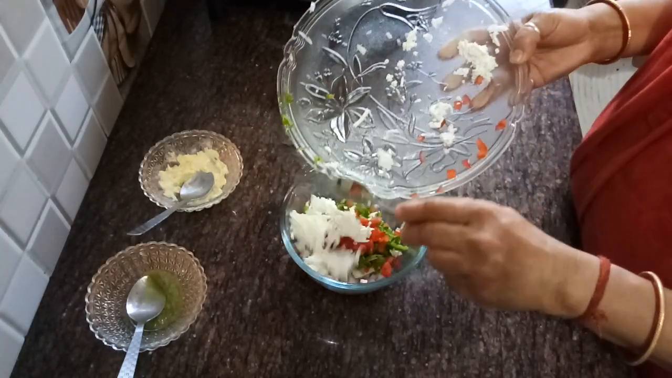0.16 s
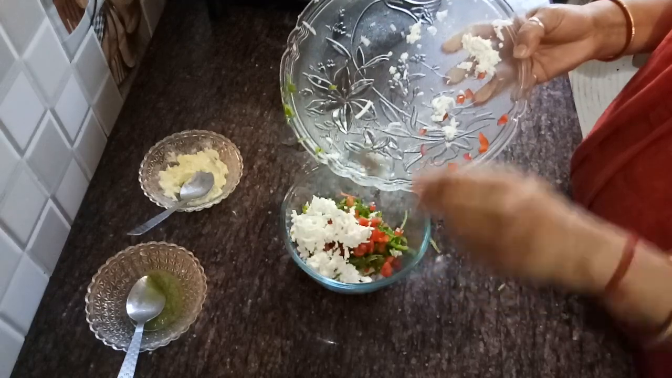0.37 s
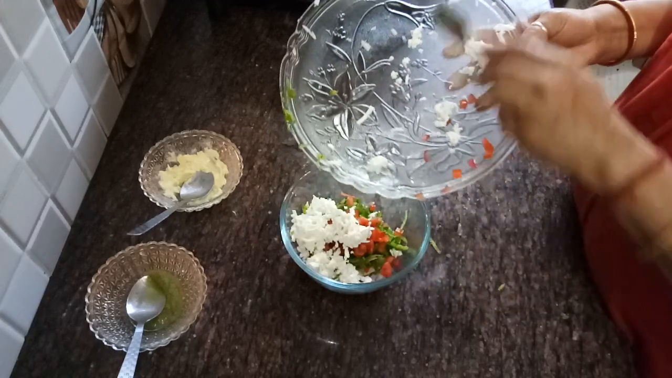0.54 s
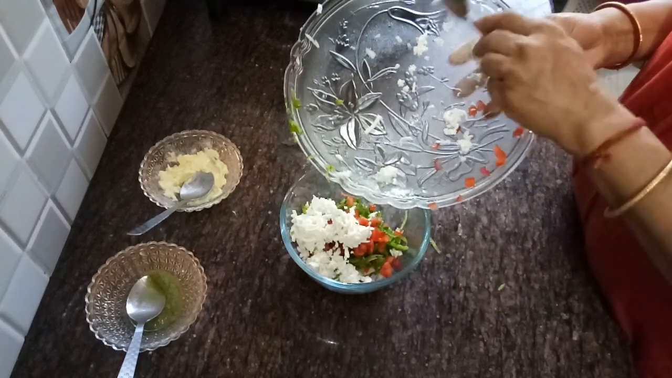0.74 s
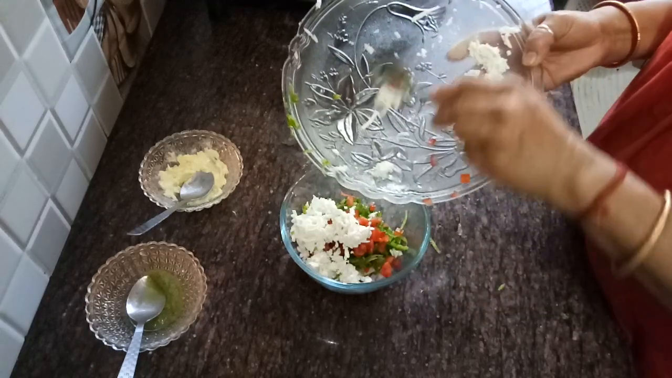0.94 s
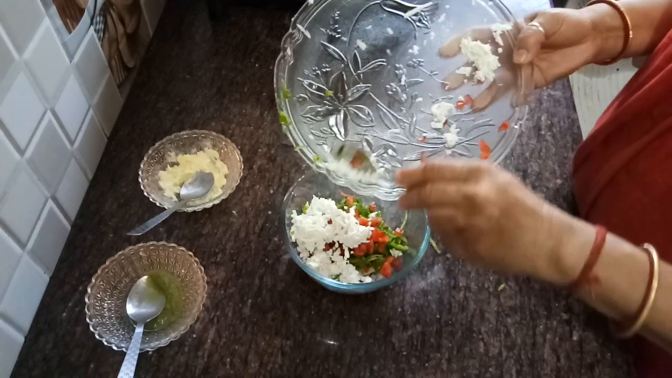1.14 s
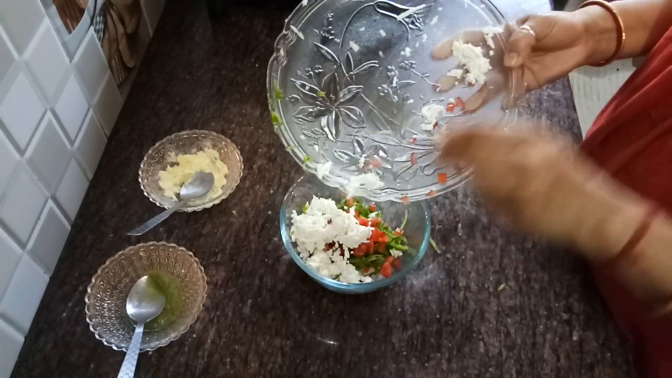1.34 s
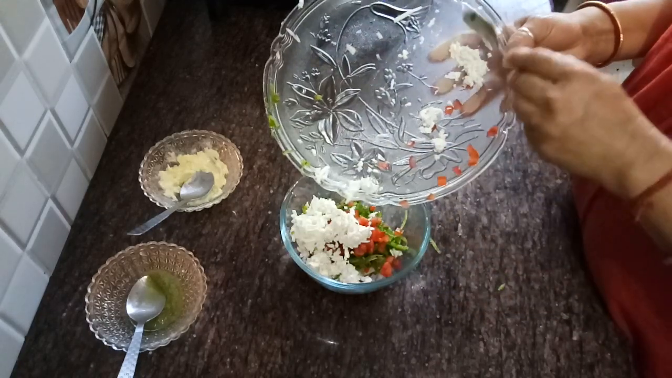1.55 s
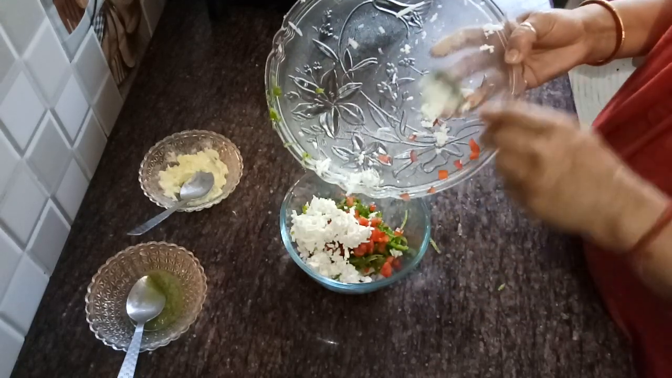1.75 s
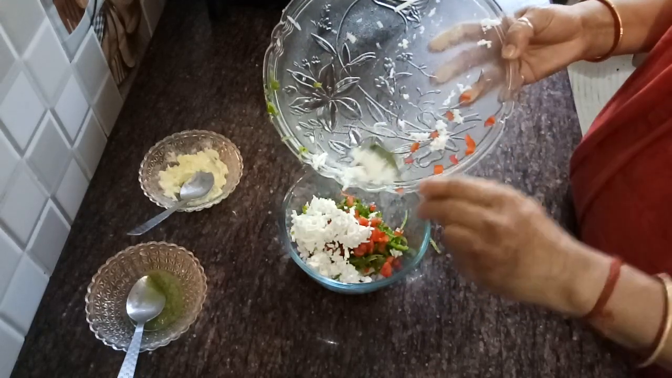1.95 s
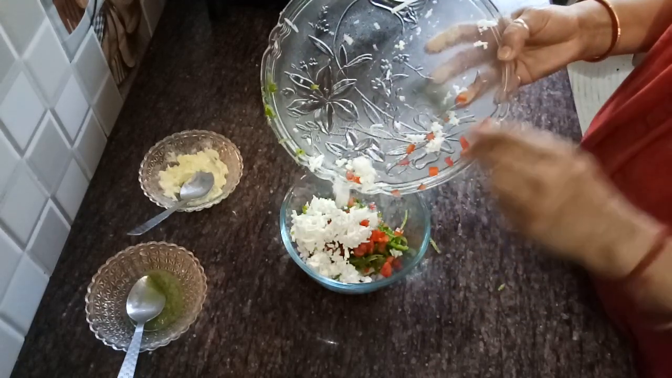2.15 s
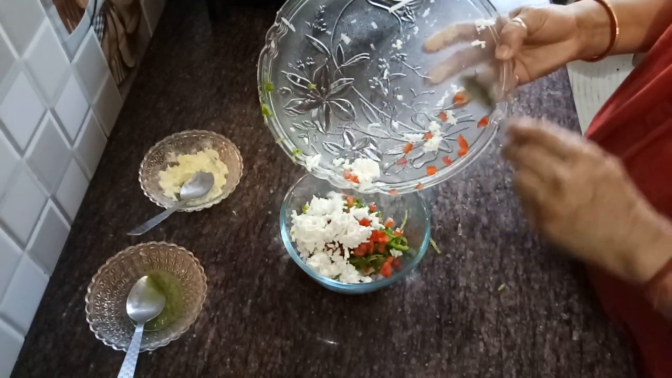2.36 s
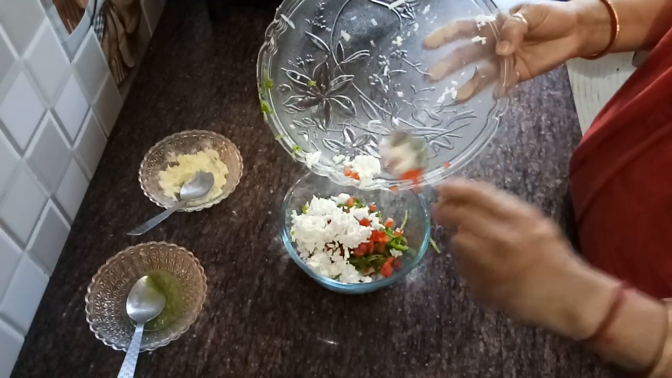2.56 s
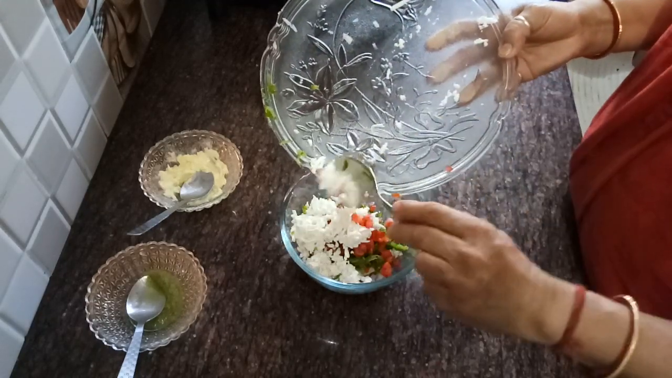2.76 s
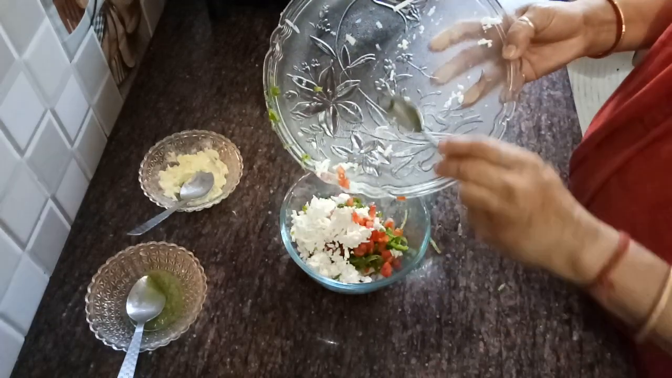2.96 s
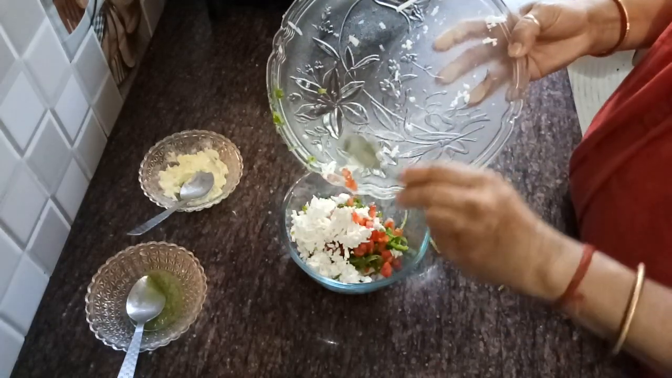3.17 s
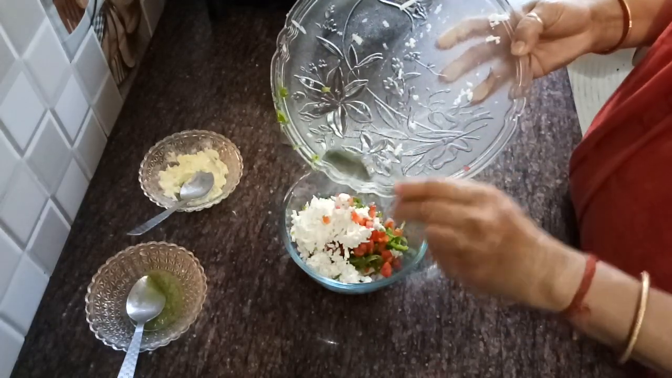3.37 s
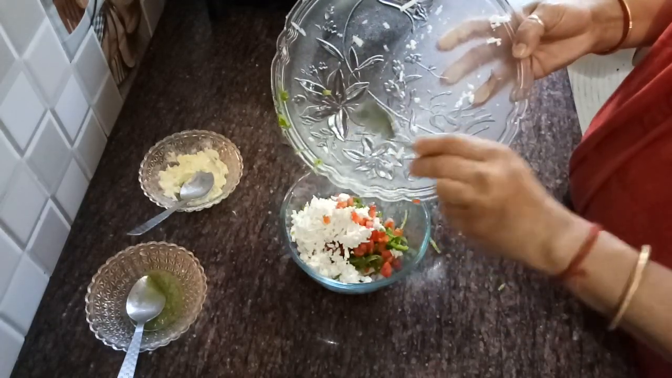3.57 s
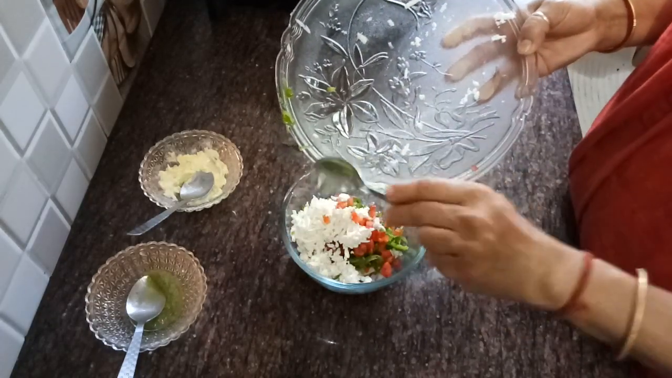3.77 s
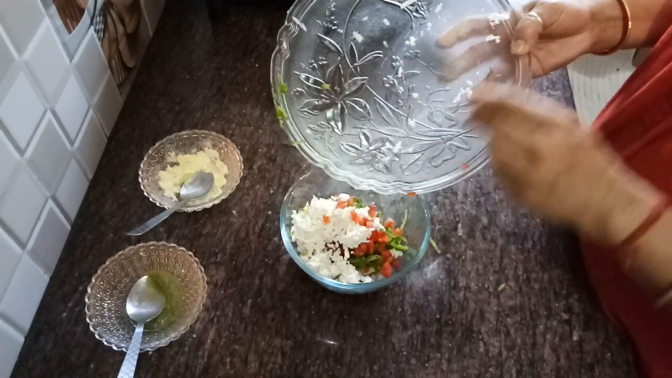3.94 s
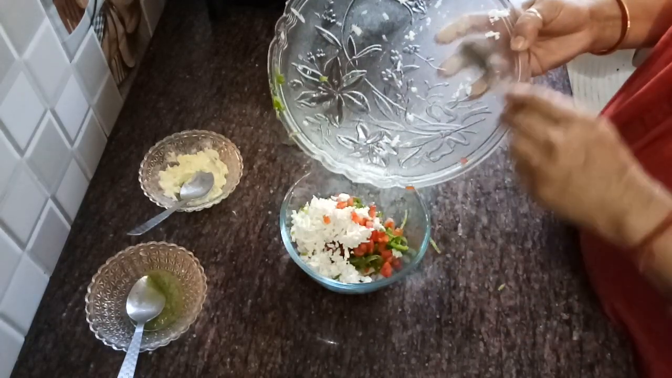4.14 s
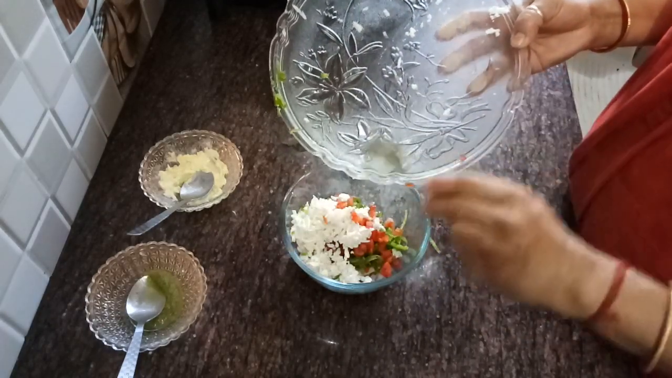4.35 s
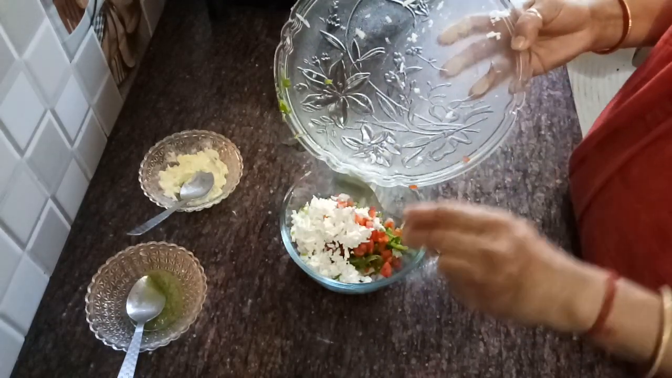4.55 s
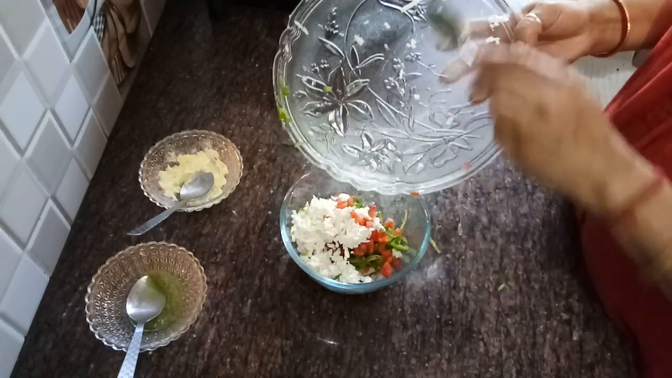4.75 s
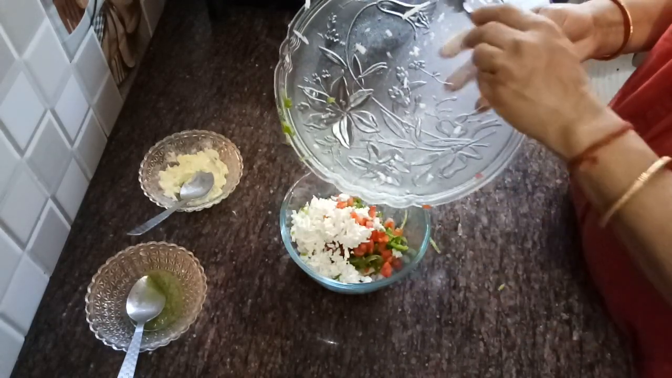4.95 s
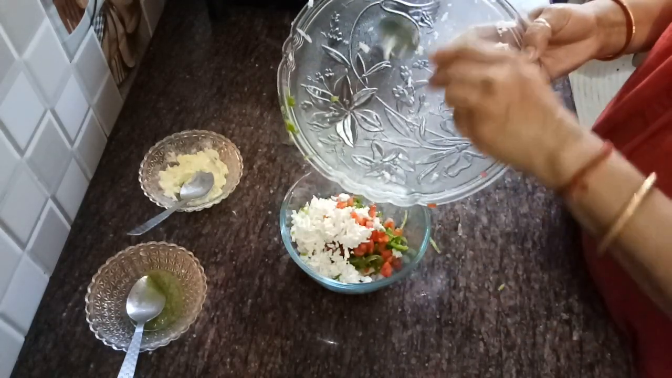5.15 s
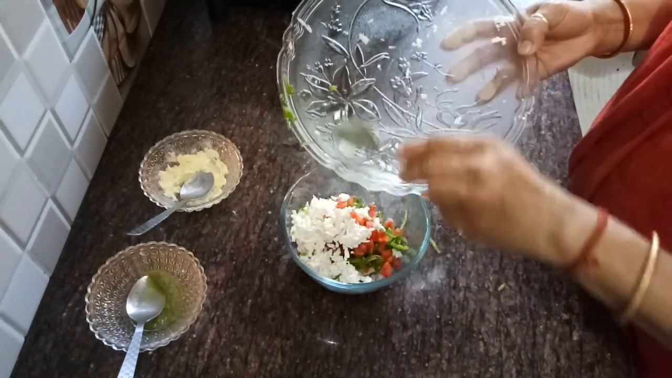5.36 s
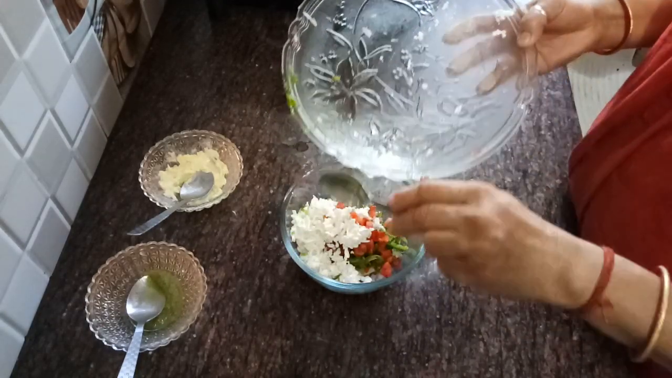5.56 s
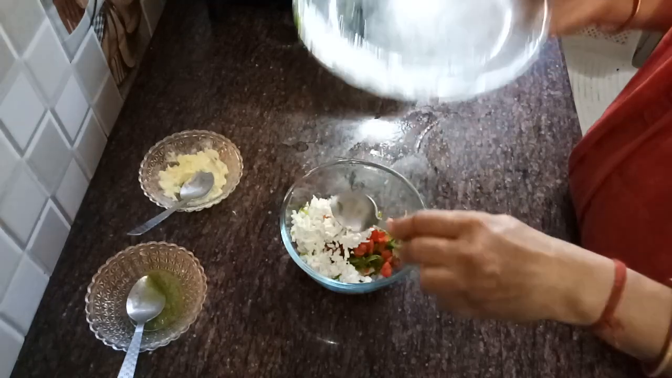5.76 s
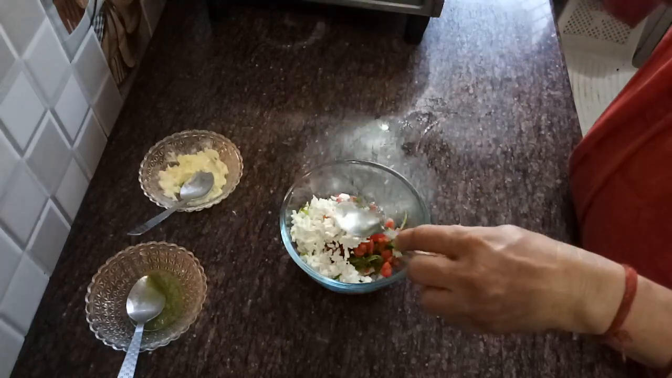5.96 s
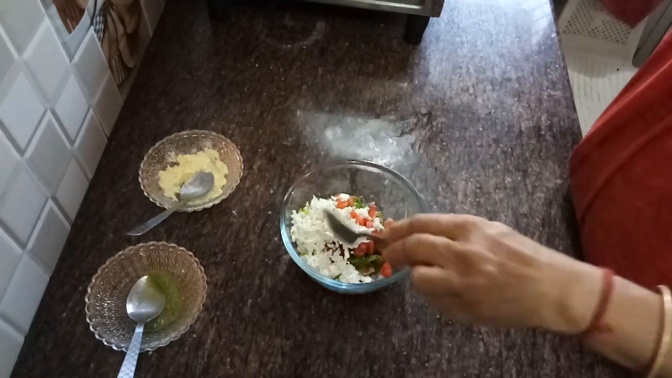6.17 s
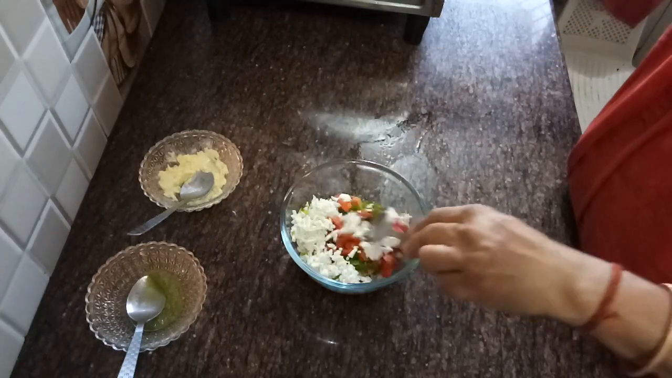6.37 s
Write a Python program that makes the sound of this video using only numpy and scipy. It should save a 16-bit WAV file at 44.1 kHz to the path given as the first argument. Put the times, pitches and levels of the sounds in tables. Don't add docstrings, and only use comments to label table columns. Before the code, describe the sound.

Quiet room air with a low hum opens, then a spoon clinks irregularly on thick glass, roughly two or three taps a second, some hard and piercing, others barely touching. Very short ridged scrapes trail many taps, and soft low knocks of food and knuckles appear midway. The glass is damped by the hand, the steel rings high and thin. Tiled walls add a short lively echo, picked up by a small nearby microphone.

```python
import sys
import numpy as np
from scipy import signal
from scipy.fft import rfft, irfft
from scipy.io import wavfile

SR = 44100
rng = np.random.default_rng(int(sys.argv[2]) if len(sys.argv) > 2 else 0)


def invert_db(x):
    u = np.asarray(x, float) / 20
    return 10 ** u


def store_wav(level_fs):
    pcm = np.round(np.clip(np.atleast_2d(level_fs), -1, 1) * 32767)
    wavfile.write(sys.argv[1], SR, pcm.T.astype(np.int16))


N = 282676

# (time [s], crack [dB], knock [dB], low, middle, high mode family [dB])
PLATE_TAPS = [(0.689, -8, -42.5, -28.5, -57.5, -43.5), (0.88, -35, -54.5, -71, -46.5, -76),
              (0.955, -5.5, -52, -24, -20.5, -54.5), (1.288, -23, -64, -67.5, -37.5, -48),
              (1.624, -5.5, -35.5, -24, -57.5, -26.5), (1.805, -25, -67, -34.5, -36, -53),
              (1.889, -40, -62.5, -56.5, -71, -69), (1.999, -42, -58.5, -52.5, -74, -64),
              (2.414, -6.5, -34, -23.5, -34, -24.5), (2.654, -29, -63.5, -48, -50.5, -50),
              (2.73, -5, -42.5, -27.5, -18.5, -21), (3.1, -6, -42, -23.5, -17, -45.5),
              (3.303, -6.5, -66, -36.5, -25, -37), (3.659, -9.5, -43, -32, -34.5, -42),
              (3.783, -37, -60, -49, -45, -46), (3.806, -26, -58.5, -47.5, -34.5, -39),
              (4.151, -2.5, -35.5, -30, -42.5, -30.5), (4.343, -36, -56, -52.5, -60, -63),
              (4.43, -2.5, -54, -36.5, -25.5, -30), (4.76, -46.5, -57.5, -66, -68.5, -67.5),
              (5.022, -11.5, -38.5, -25, -40.5, -31.5), (5.248, -9.5, -46, -20.5, -21, -41),
              (5.486, -35, -56, -56, -42.5, -54), (5.52, -29.5, -58, -43, -33.5, -44)]
PLATE_HZ = [1290, 1540, 2185, 2535]
SPOON_HZ = [3470, 3740, 5060, 5200, 6540, 6780, 7240]
EDGE_HZ = [7850, 8260, 8830, 8965, 9070, 9465, 10100, 11400, 11780, 12200, 13400, 14000, 14200, 14500]
# (spread [Hz], level [dB])
PLATE_MODES = [(68, -2), (31, -12.5), (55, -2), (45, 0)]
SPOON_MODES = [(35, 4.5), (65, 4.5), (60, 3), (90, 1.5), (35, -2), (50, 4.5), (31, -7.5)]
EDGE_MODES = [(120, -12), (54, -9.5), (40, -5.5), (40, 1), (40, -5.5), (50, 1), (44, -2.5), (87, -1),
              (120, -5), (59, -4.5), (52, -11), (43, -4), (60, -1.5), (37, -5)]


def rms_one(x):
    return x / np.sqrt(np.mean(x ** 2) + 1e-20)


def at_hz(points, hz):
    points_hz, value = np.array(points).T
    return np.interp(np.log(hz), np.log(points_hz), value)


def colour(x, spectrum):
    hz = np.fft.rfftfreq(N, 1 / SR) + 1
    return irfft(rfft(x) * invert_db(at_hz(spectrum, hz)), N)


def in_time(rows):
    s, *columns = np.transpose(rows)
    return [np.interp(np.arange(N) / SR, s, c) for c in columns]


def drift(rate_hz):
    r = np.exp(-80 * np.pi * rate_hz / SR)
    white = rng.standard_normal(N // 40 + 2002)
    slow = signal.lfilter([1], [1, -2 * r, r * r], white)[2000:]
    return np.interp(np.arange(N) / 40, np.arange(len(slow)), rms_one(slow))


def resonate(x, hz, width_hz):
    r = np.exp(-np.pi * width_hz / SR)
    poles = [1, -2 * r * np.cos(2 * np.pi * hz / SR), r * r]
    return signal.lfilter([(1 - r * r) / 2, 0, (r * r - 1) / 2], poles, x)


def bands(length):
    edges_hz = 25 * 2 ** np.arange(0, 9.6, .5)
    white = rng.standard_normal((2, length))
    for k, (low, high) in enumerate(zip(edges_hz, edges_hz[1:])):
        sos = signal.butter(2, [low, high], "band", fs=SR, output="sos")
        yield np.sqrt(low * high), signal.sosfilt(sos, white[k % 2])


def add(out, sound, s):
    i = round(s * SR)
    out[i:i + len(sound)] += sound[:N - i]


def house():
    # (time [s], rumble [dB], street murmur [dB])
    house_levels = [(0.0, -65.5, -61), (0.19, -68, -63), (0.41, -69, -64.5), (0.69, -73, -64.5),
                    (0.87, -68.5, -58), (1.02, -69.5, -60.5), (1.21, -64, -60), (1.43, -60, -63),
                    (1.71, -63.5, -61), (2.11, -62, -59.5), (2.21, -58, -58.5), (2.37, -69.5, -62),
                    (2.52, -67, -57.5), (2.64, -64.5, -59.5), (3.25, -82.5, -63), (3.52, -68.5, -61),
                    (3.78, -67.5, -60.5), (3.89, -67.5, -59), (4.03, -67.5, -62.5), (4.41, -77.5, -64),
                    (4.71, -73, -62), (4.82, -75.5, -63), (5.07, -67, -65), (5.25, -74, -63),
                    (5.48, -77, -63.5), (5.62, -73, -62), (5.89, -72.5, -59.5), (6.12, -72, -65.5),
                    (6.41, -69.5, -65)]
    # (frequency [Hz], level [dB per Hz])
    air_spectrum = [(25, -30.5), (60, -25), (110, -10), (200, -15.5), (420, -2), (800, -6.5), (1300, -12),
                    (2500, -19.5), (6500, -25.5), (7600, -34.5), (10500, -34.5), (13000, -40), (15000, -33),
                    (16500, -40.5)]
    # (time [s], frequency [Hz], level [dB])
    far_tone = [
        (1.18, 1120, -99),
        (1.25, 1120, -58.5),
        (1.45, 1120, -63.5),
        (1.55, 1120, -87),
    ]
    rumble_db, street_db = [c - np.median(c) for c in in_time(house_levels)]
    air = 0
    for hz, noise in bands(N):
        share = min(1000 / hz, 1)
        swell_db = rumble_db if hz < 220 else street_db * share
        air = air + noise * invert_db(swell_db + (.8 + 1.7 * share) * drift(6))
    air = invert_db(-59.5) * rms_one(colour(air, air_spectrum))

    white = rng.standard_normal(N)
    hum_hz, hum_width_hz, hum_db = 99, 25, -67.5
    hum = resonate(resonate(white, hum_hz, hum_width_hz), hum_hz, hum_width_hz)
    hum = invert_db(hum_db) * rms_one(hum)
    whine_hz, whine_width_hz, whine_db = 10350, 60, -89
    whine = invert_db(whine_db + 1.5 * drift(3)) * rms_one(resonate(white, whine_hz, whine_width_hz))
    tone_hz, tone_db = in_time(far_tone)
    tone = invert_db(tone_db + 3.0 * drift(14)) * np.sin(2 * np.pi * np.cumsum(tone_hz) / SR)
    return air + hum + whine + tone


def cracks():
    # (frequency [Hz], level [dB per Hz])
    crack_spectrum = [(700, -39), (1100, -17), (2000, -12.5), (4000, -14), (7000, -13.5), (10000, -15.5),
                      (13000, -22), (16500, -23)]
    knock_band_hz = [450, 930]
    t = np.arange(SR // 20) / SR
    crack, knock = np.zeros(N), np.zeros(N)
    crack_shape = np.exp(-t / 0.0032) * (1 - np.exp(-t / 0.001))
    knock_shape = np.exp(-t / .006)
    white = rng.standard_normal((len(PLATE_TAPS), 2, len(t)))
    for (s, crack_db, knock_db, *_), bursts in zip(PLATE_TAPS, white):
        add(crack, invert_db(crack_db + 4) * bursts[0] * crack_shape, s)
        add(knock, invert_db(knock_db + 13.5) * bursts[1] * knock_shape, s)
    knock_sos = signal.butter(3, knock_band_hz, "band", fs=SR, output="sos")
    crack_sos = signal.butter(4, 800, "high", fs=SR, output="sos")
    knock = signal.sosfilt(knock_sos, knock + 1e-18)
    return signal.sosfilt(crack_sos, colour(crack, crack_spectrum)) + knock


def struck(levels_db, hz, modes, family_hz, t60_s, offset_db, scatter_db):
    hz = np.array(hz)
    spread_hz, mode_db = np.transpose(modes)
    family = np.searchsorted(family_hz, hz)
    out, t = np.zeros(N), np.arange(SR // 5) / SR
    fading = invert_db(-60 * t / t60_s * (hz[:, None] / hz[0]) ** .15)
    fading = fading * (1 - np.exp(-t / .001))
    chance = rng.standard_normal((len(levels_db), 2, 3, len(hz)))
    for (s, *_), family_db, (tune, strength) in zip(PLATE_TAPS, levels_db, chance):
        gains = invert_db(family_db[family] + mode_db + offset_db + scatter_db * strength)
        phases = 2 * np.pi * (hz + .5 * spread_hz * tune)[..., None] * t
        triples = gains[..., None] * np.sin(phases.astype(np.float32)) * fading
        add(out, np.sum(triples, axis=(0, 1)), s)
    return out


def plate_ring():
    levels_db = np.array(PLATE_TAPS)[:, 3:]
    return struck(levels_db, PLATE_HZ, PLATE_MODES, family_hz=[1900, 2360],
                  t60_s=0.09, offset_db=-5.5, scatter_db=2.0)


def spoon_ring():
    # (time [s], peak [dB], four mode families from the lowest up [dB])
    spoon_taps = [(0.6913, -15, -40.5, -31, -22, -28.5), (0.8799, -42, -53.5, -63, -56, -52),
                  (0.9577, -15, -28, -32, -23.5, -32.5), (1.291, -23, -36, -35, -38.5, -49.5),
                  (1.6234, -12, -30.5, -21.5, -21, -28), (1.8058, -31, -40, -54, -41.5, -51),
                  (1.8894, -46, -63, -63, -63, -61), (1.9984, -50, -70, -64, -66, -65),
                  (2.4149, -23, -36.5, -25, -23.5, -28.5), (2.6539, -44, -64.5, -63.5, -52, -46),
                  (2.7297, -11, -27.5, -20.5, -25, -24), (3.0994, -15, -31.5, -35.5, -20.5, -31),
                  (3.3034, -7, -25.5, -27.5, -21.5, -23), (3.6616, -14, -35, -40, -22, -41.5),
                  (3.7853, -33, -43, -54, -47, -48), (3.8038, -29, -43.5, -42, -43, -42.5),
                  (4.152, -10, -23, -25, -18.5, -23), (4.3425, -36, -53, -55.5, -47.5, -50),
                  (4.4308, -8, -26.5, -19, -24, -14.5), (4.7604, -52, -70, -66, -63, -67),
                  (5.0235, -16, -39, -35.5, -27, -26.5), (5.2505, -16, -28, -35, -24, -38.5),
                  (5.4824, -44, -55, -46.5, -55.5, -54), (5.5209, -31, -50.5, -37.5, -43, -56)]
    levels_db = np.array(spoon_taps)[:, 2:]
    return struck(levels_db, SPOON_HZ, SPOON_MODES, family_hz=[3600, 4400, 5900],
                  t60_s=0.056, offset_db=-9, scatter_db=2.0)


def edge_ring():
    # (time [s], peak [dB], four mode families from the lowest up [dB])
    edge_taps = [(0.6893, -9, -16.5, -22.5, -25, -34), (0.8804, -43.5, -53.5, -58, -65.5, -71),
                 (0.9547, -16, -22, -38, -30.5, -46.5), (1.288, -35, -49.5, -47.5, -55, -63),
                 (1.6237, -11, -21, -22.5, -30, -39), (1.8044, -49, -60, -64, -64, -68),
                 (1.8901, -58, -51, -63, -57, -64), (1.9984, -51, -63, -71, -58, -69),
                 (2.4149, -8, -19.5, -19.5, -21, -28), (2.6539, -33, -43.5, -46, -51.5, -62.5),
                 (2.7292, -23, -33, -42, -46.5, -49), (3.0994, -16, -19, -30, -34.5, -40),
                 (3.3034, -12, -21.5, -21.5, -26.5, -39.5), (3.6586, -18, -30, -29, -36.5, -45),
                 (3.7844, -42, -56, -50, -59, -58), (3.8038, -43, -57, -57, -71, -61.5),
                 (4.151, -14, -21.5, -27, -32, -40.5), (4.3424, -44, -55.5, -59, -60.5, -72.5),
                 (4.4293, -16.5, -18.5, -29.5, -30.5, -37.5), (4.7604, -68, -83, -78, -87, -82),
                 (5.023, -7.5, -20.5, -24.5, -25.5, -33.5), (5.248, -28, -27, -45, -32, -56),
                 (5.4854, -43, -57, -60, -65, -71), (5.5199, -42.5, -58, -59, -65, -67)]
    levels_db = np.array(edge_taps)[:, 2:]
    return struck(levels_db, EDGE_HZ, EDGE_MODES, family_hz=[9250, 10700, 13000],
                  t60_s=.07, offset_db=-10, scatter_db=5.0)


def drags():
    # (start [s], length [s], plate [dB], spoon [dB])
    drag_strokes = [(.7, 0.078, -66, -44.5), (0.836, 0.071, -47.5, -75.5), (0.976, .05, -42, -58.5),
                    (1.272, 0.035, -41.5, -44), (1.655, 0.055, -32.5, -39), (1.872, 0.11, -69, -71.5),
                    (2.428, 0.083, -52, -45.5), (2.63, 0.059, -53, -67), (2.738, 0.075, -22.5, -73),
                    (3.113, 0.033, -32, -43), (3.309, 0.042, -28.5, -55), (3.685, 0.041, -54, -65.5),
                    (3.743, 0.13, -49, -74), (4.162, 0.07, -30.5, -41.5), (4.3, 0.12, -59.5, -58.5),
                    (4.452, 0.084, -26, -31.5), (5.031, 0.072, -33.5, -62), (5.262, 0.049, -47, -53),
                    (5.464, 0.036, -66.5, -55)]
    t, ramp_s = np.arange(N) / SR, 0.016
    hits = rng.random(N) < 1500 / SR
    hits = hits * invert_db(3.7 * np.minimum(rng.exponential(1, N), 4))
    chatter = rms_one(hits * rng.choice([-1, 1], N))
    bodies = ((2, PLATE_HZ + SPOON_HZ[:2], PLATE_MODES + SPOON_MODES[:2], 17.0),
              (3, SPOON_HZ[2:] + EDGE_HZ[:-4], SPOON_MODES[2:] + EDGE_MODES[:-4], 55.0))
    out = 0
    for column, modes_hz, modes, width_hz in bodies:
        stroke = 0
        for row in drag_strokes:
            start_s, length_s = row[:2]
            to_end_s = np.minimum(t - start_s, start_s + length_s - t)
            stroke = stroke + invert_db(row[column]) * np.clip(to_end_s / ramp_s, 0, 1)
        push = chatter * stroke + 1e-18
        for hz, (_, db) in zip(modes_hz, modes):
            tilt_db = -6.0 * np.log2(hz / modes_hz[0])
            out = out + invert_db(db + 14.5 + tilt_db) * resonate(push, hz, width_hz)
    return out


def kitchen(x, count=4):
    # (frequency [Hz], t60 [s])
    room_t60 = [(500, 0.37), (2000, 0.31), (6000, 0.35), (11000, 0.17), (16000, 0.42)]
    switch_s = [.69, .881, .956, 1.291, 1.624, 1.805, 1.89, 1.999, 2.415, 2.654, 2.73, 3.1, 3.304, 3.661,
                3.785, 3.806, 4.152, 4.343, 4.43, 4.761, 5.023, 5.249, 5.486, 5.52]
    t, out = np.arange(SR * 3 // 5) / SR, 0
    turn = np.searchsorted(np.array(switch_s) - .01, np.arange(N) / SR) % count
    for k in range(count):
        tail = 0
        for hz, noise in bands(len(t)):
            if hz > 300:
                tail = tail + noise * invert_db(-60 * t / at_hz(room_t60, hz))
        tail = tail * (1 - np.exp(-t / .003))
        tail = tail / np.sqrt(np.sum(tail ** 2))
        out = out + signal.fftconvolve(x * (turn == k), tail)[:N]
    return out


def thuds():
    # (time [s], peak [dB], frequency [Hz])
    soft_knocks = [
        (0.87, -45, 91.5),
        (0.909, -43.5, 229),
        (2.161, -37.5, 360),
        (2.19, -36.5, 351),
        (2.271, -48, 96.9),
        (2.484, -34, 95),
        (4.422, -46, 155),
    ]
    t, out = np.arange(SR // 8) / SR, np.zeros(N)
    for s, peak_db, hz in soft_knocks:
        shape = np.exp(-t * hz / 2.0) * (1 - np.exp(-t / .003))
        add(out, invert_db(peak_db) * np.sin(2 * np.pi * hz * t) * shape, s)
    return out


def scene():
    contact = cracks()
    ringing = plate_ring() + spoon_ring() + edge_ring() + drags()
    room_db = 2.5
    echoes = invert_db(room_db) * kitchen(ringing + contact)
    lasting = ringing + echoes + thuds() + house()
    top_cut = signal.cheby2(14, 50, 15800, fs=SR, output="sos")
    return (signal.sosfilt(top_cut, lasting) + contact)[None]


def roll_off(x):
    return signal.sosfilt(signal.butter(12, 16810, fs=SR, output="sos"), x)


def record(dry):
    top_cut = signal.cheby2(10, 60, 16900, fs=SR, output="sos")
    return roll_off(signal.sosfilt(top_cut, dry))


dry = scene()
out = record(dry)
store_wav(out)
```